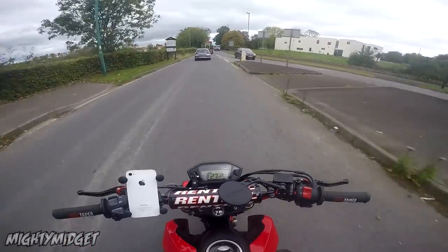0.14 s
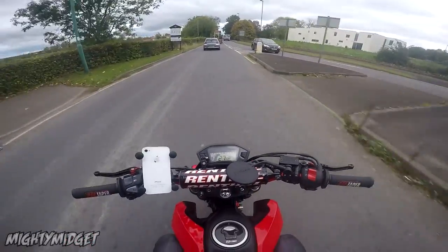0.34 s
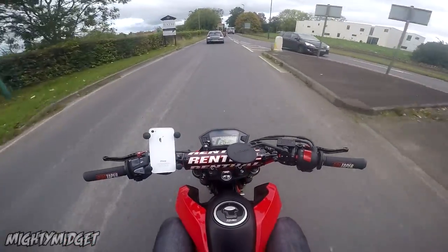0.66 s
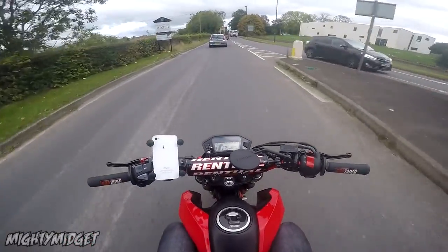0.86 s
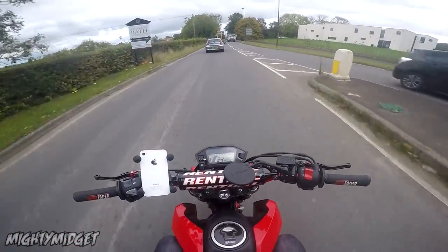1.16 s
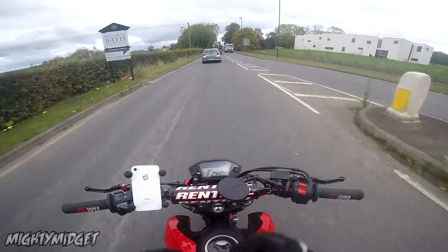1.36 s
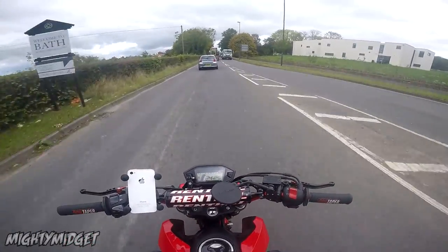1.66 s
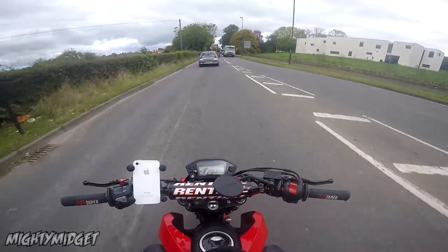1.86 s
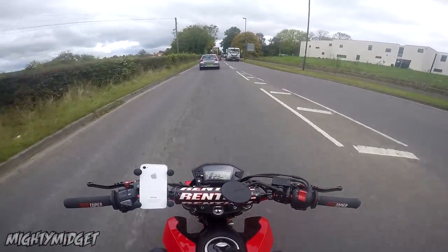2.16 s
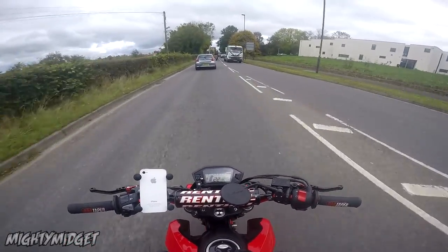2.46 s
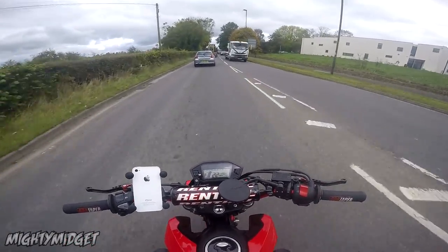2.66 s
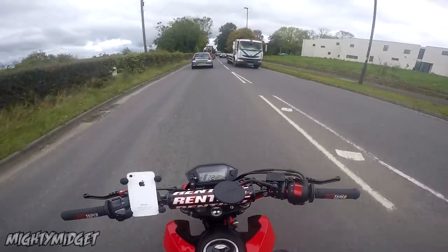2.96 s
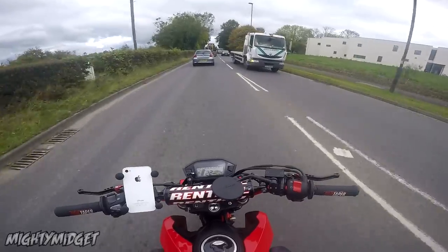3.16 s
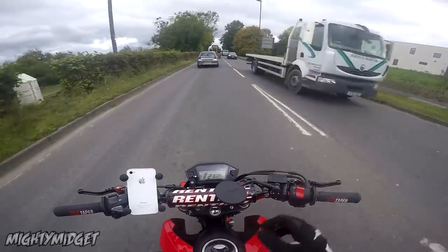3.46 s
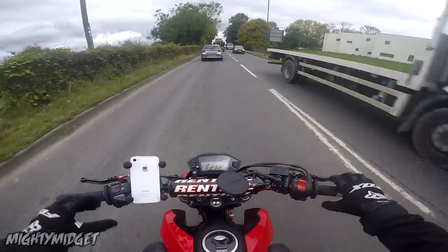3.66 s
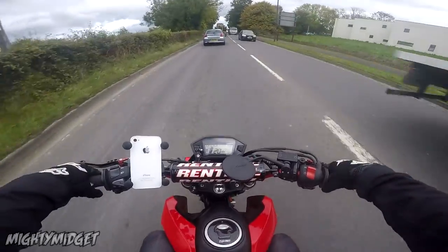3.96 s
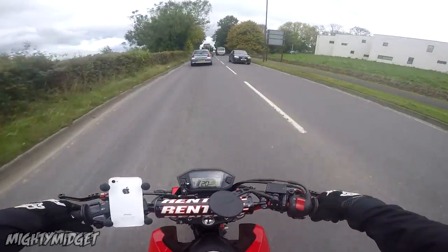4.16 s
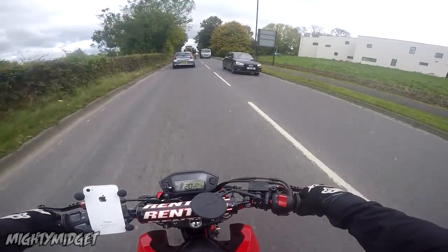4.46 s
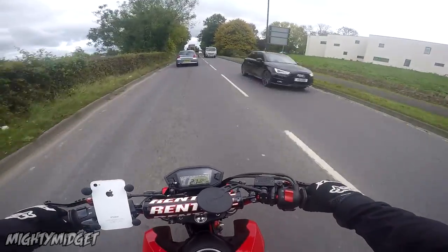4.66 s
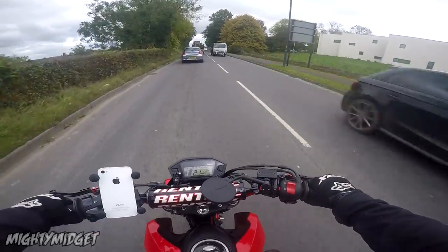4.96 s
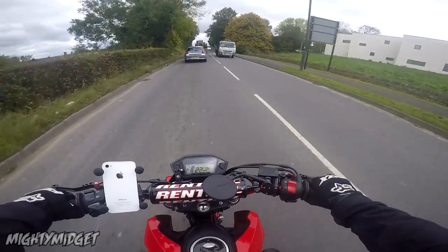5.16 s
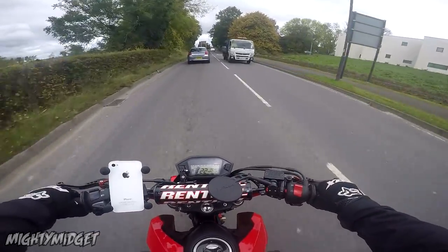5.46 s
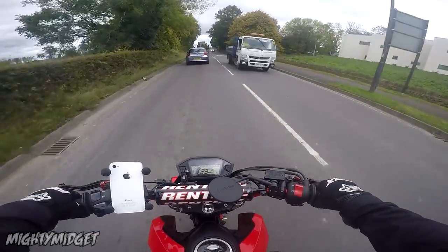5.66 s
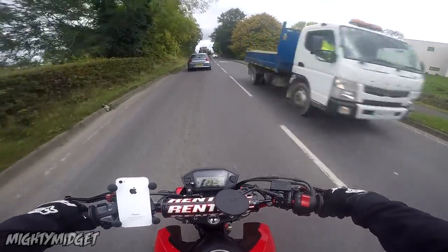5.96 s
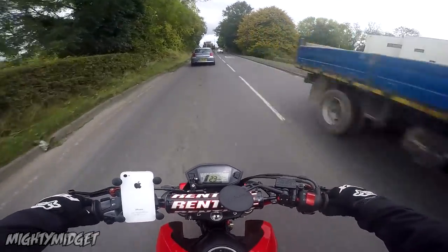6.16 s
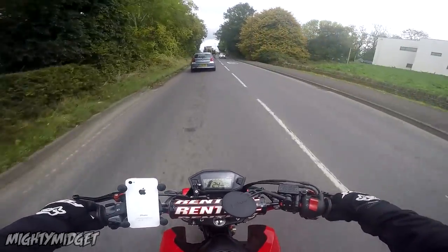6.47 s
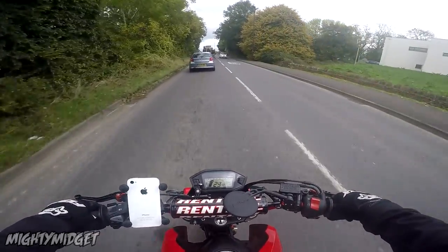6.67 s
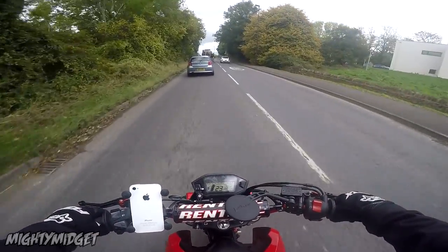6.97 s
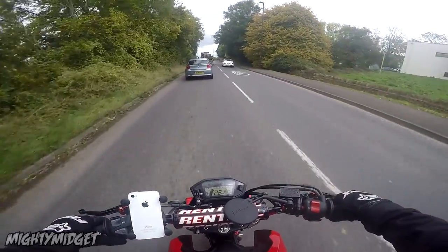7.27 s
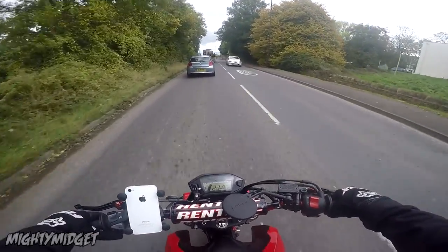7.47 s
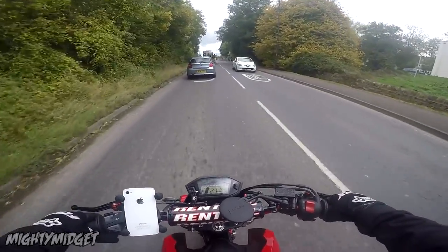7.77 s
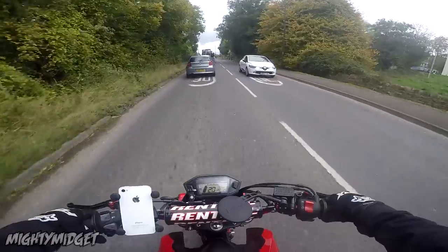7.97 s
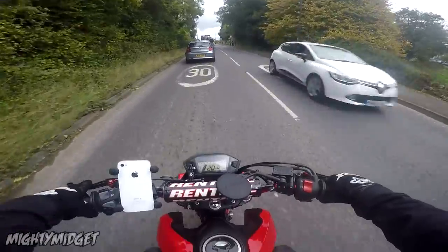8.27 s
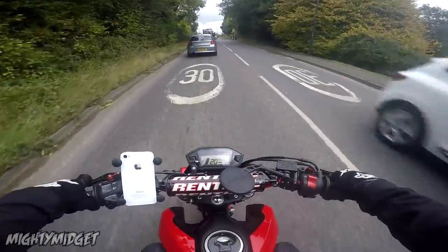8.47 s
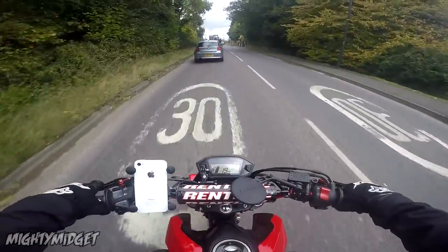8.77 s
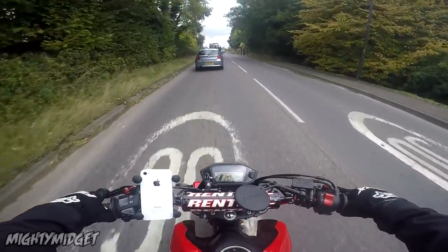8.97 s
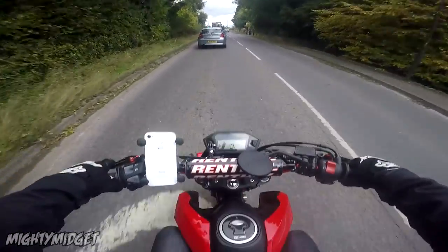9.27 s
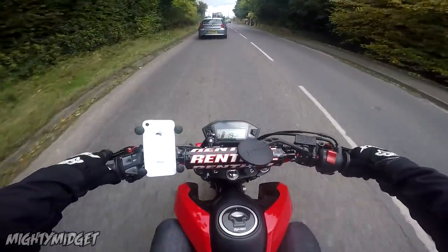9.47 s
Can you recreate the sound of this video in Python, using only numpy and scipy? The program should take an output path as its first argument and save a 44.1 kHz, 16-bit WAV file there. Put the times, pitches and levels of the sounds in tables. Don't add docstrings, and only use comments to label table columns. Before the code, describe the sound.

Close, muffled stereo from a motorcycle rider: low fluttering exhaust thumps gradually fall in pitch, with scattered dull pops and sleeves rubbing. A truck whooshes past on the right. The engine then catches roughly and accelerates in a loud, clipped, cracking burst, releases to boomy overrun with rounder pops, and finally takes light throttle. Low wind buffeting and steady road roar continue, with further passing traffic.

```python
import sys
import numpy as np
from scipy import signal
from scipy.io import wavfile
from scipy.ndimage import uniform_filter1d

SR = 44100
rng = np.random.default_rng(int(sys.argv[2]) if len(sys.argv) > 2 else 0)


def natural_amplitude(level_db):
    exponent = np.asarray(level_db, float) / 20
    return 10 ** exponent


def digitize_waveform(pressure):
    field = np.atleast_2d(pressure).T
    bounded = np.clip(field, -1, 1)
    quanta = np.round(bounded * 32767).astype(np.int16)
    wavfile.write(sys.argv[1], SR, quanta)


N = 424240


def curve(table, t):
    s, *columns = np.transpose(table)
    return [np.interp(t, s, c) for c in columns]


def humps(table, t):
    return sum(db * np.exp(-((t - s) / half_s) ** 2) for s, db, half_s in table)


def unit(x):
    return x / np.sqrt(np.mean(x ** 2))


def band(x, lo_hz, hi_hz):
    sos = signal.butter(2, [lo_hz, hi_hz], "band", fs=SR, output="sos")
    return unit(signal.sosfilt(sos, x))


def noise():
    return rng.standard_normal((2, N))


def walk(rate_hz):
    k = int(SR / rate_hz)
    held = np.repeat(rng.standard_normal(N // k + 1), k)
    return unit(uniform_filter1d(uniform_filter1d(held, k), k)[:N])


def add_mode(out, peak_s, hz, t60_s, rise_s, gain, pan_db):
    lead_s = .75 / hz
    first = int((peak_s - lead_s) * SR)
    index = np.arange(max(first, 0), min(first + int(1.25 * t60_s * SR), N))
    for side, lag_s, pan_share in ((0, .00062, .96), (1, .0003, -1.4)):
        t = np.maximum(index / SR - peak_s + lead_s - lag_s, 0)
        shape = (1 - np.exp(-t / rise_s)) * np.exp(-np.log(1000) * t / t60_s)
        out[side, index] -= gain * natural_amplitude(pan_share * pan_db / 2) * shape * np.sin(2 * np.pi * hz * t)


# (time [s], rate [Hz])
CYCLE_RATE = [(0.0, 32.22), (0.6, 30.76), (1.06, 29.25), (2.07, 27.37), (4.34, 23.99), (4.59, 25.26),
              (4.8, 24.63), (4.97, 25.5), (5.72, 28.43), (6.02, 27.68), (6.47, 27.36), (7.34, 25.17),
              (8.4, 23.54), (8.59, 22.82), (8.83, 24.31), (8.99, 22.98), (9.15, 23.0), (9.62, 23.46)]
# (time [s], swing [ms], rate [Hz], decay [s])
CHAIN_SNATCH = (4.563, 5.1, 6.2, 0.2)


def cycles():
    t = np.arange(N) / SR
    turns = np.cumsum(curve(CYCLE_RATE, t)[0]) / SR
    first_turn = .032
    at = np.interp(np.arange(int(turns[-1]) + 1) + first_turn, turns, t)
    start_s, swing_ms, shake_hz, decay_s = CHAIN_SNATCH
    since = at - start_s
    shake = np.exp(-np.abs(since) / decay_s) * np.cos(2 * np.pi * shake_hz * since) * (since > -.01)
    jitter_s = .00012 * rng.standard_normal(len(at))
    return at + shake * swing_ms / 1000 + jitter_s


# (time [s], level [dB])
BOOM_LEVEL = [(0, -18), (2, -19.5), (4.3, -20.5), (4.6, -20.5), (4.78, -13.5), (5.55, -21), (5.75, -19),
              (5.9, -26.5), (6.0, -18), (7.1, -20), (8.62, -20.5), (8.71, -24.5), (9.0, -23.5), (9.4, -20),
              (9.62, -21)]
# (frequency [Hz], t60 [s], swell [s])
SILENCER_VOLUME = (95, .063, .05)


def boom(at, load_db):
    out = np.zeros((2, N))
    hz, t60_s, swell_s = SILENCER_VOLUME
    crest_s = at + .0082
    steadiness = 1 - .8 * (load_db > -99)
    chance = rng.standard_normal((len(at), 3)) * steadiness[:, None]
    pump_db = curve(BOOM_LEVEL, at)[0] - np.clip(load_db + 21, 0, 8)
    for s, db, (size, pitch, pipe) in zip(crest_s, pump_db, chance):
        add_mode(out, s, hz * (1 + .022 * pitch), t60_s, swell_s, natural_amplitude(db + 31.5 + size), 3.1)
        add_mode(out, s, 300 * (1 + .015 * pipe), .045, .002, natural_amplitude(db + 5 + 2.2 * size), 3.1)
        add_mode(out, s, 150 * (1 + .012 * pipe), .04, .004, natural_amplitude(db + 2 + 1.1 * pipe), 3.1)
    return out


# (time [s], level [dB])
STRAY_POPS = [
    [(0.002, -23.5), (0.064, -23), (0.094, -22.5), (0.222, -21.5), (0.317, -21.5), (0.347, -21.5),
     (0.411, -22), (0.508, -20.5), (0.604, -27), (0.637, -22.5), (0.671, -24), (0.736, -22.5), (0.768, -25),
     (0.836, -22.5), (0.903, -29), (0.936, -22), (1.038, -21.5), (1.072, -22.5), (1.141, -20.5),
     (1.279, -24)],
    [(1.524, -23.5), (1.558, -28), (1.665, -21), (1.772, -27.5), (1.808, -25.5), (1.915, -25.5),
     (1.988, -22), (2.098, -24.5), (2.21, -26.5), (2.319, -25), (2.431, -23.5), (2.58, -24.5),
     (2.694, -26.5), (2.805, -25), (2.919, -24.5), (3.191, -23), (3.31, -28.5), (3.425, -26), (3.746, -25),
     (4.029, -25), (4.402, -27)],
    [(5.99, -27), (6.207, -26), (6.389, -22.5), (6.536, -21), (6.722, -19.5), (6.834, -24), (6.987, -24.5),
     (7.141, -21), (7.222, -22.5), (7.699, -20.5), (7.822, -25.5), (7.945, -29), (8.07, -26),
     (8.195, -22.5), (8.323, -24), (8.448, -21.5), (8.535, -26.5), (8.579, -24.5), (8.622, -21.5)],
]


def strays(at, load_db):
    faint_share, faint_db = .27, -29
    s, pop_db = np.concatenate(STRAY_POPS).T
    s = at[np.abs(at[:, None] - s).argmin(axis=0)]
    unused = np.abs(at[:, None] - s).min(axis=1) > .012
    faint = at[unused & (load_db < -99) & (rng.random(len(at)) < faint_share)]
    s, pop_db = np.r_[s, faint], np.r_[pop_db, np.full(len(faint), faint_db)]

    knee_hz, sharp_db_per_hz = 28.26, 5
    sharp_db = -11 + sharp_db_per_hz * np.maximum(curve(CYCLE_RATE, s)[0] - knee_hz, 0)
    sharp_db -= .45 * np.maximum(pop_db + 27.5, 0)
    sharp_db += 1.1 * np.minimum(pop_db + 30, 0)
    return s, pop_db, sharp_db + 1.5 * rng.standard_normal(len(s))


def burn(at, burn_db, sharp_db, modes, scatter_db, detune, gas_db, crack_db):
    out, puff = np.zeros((2, N)), np.zeros(N)
    chance = rng.standard_normal((len(at), 2, len(modes)))
    hardness = np.clip((sharp_db + 18) / 10.5, 0, 1.3)
    for s, db, hard, (size, pitch) in zip(at, burn_db, hardness, chance):
        for (hz, t60_s, soft_db, hard_db, pan_db, ms), a, b in zip(modes, size, pitch):
            blend = max(1 - hard, 0) * natural_amplitude(soft_db) + hard * natural_amplitude(hard_db)
            mode_hz = hz * (1 + detune * b * min(hz / 600, 1))
            add_mode(out, s + ms / 1000, mode_hz, t60_s, 1 / hz, blend * natural_amplitude(db + scatter_db * a), pan_db)
        puff[min(int(s * SR), N - 1)] = hard * natural_amplitude(db + gas_db)
    t = np.arange(3000) / SR
    tail = (1 - np.exp(-t / .0008)) ** 2 * np.exp(-t / .0048)
    crack = band(band(noise(), 900, 2000), 700, 3000)
    gas = band(noise(), 330, 1300) + natural_amplitude(crack_db) * crack
    return out + signal.fftconvolve(puff, tail)[:N] * gas * natural_amplitude([[2.1], [-2.1]])


# (time [s], burn level [dB], sharpness [dB])
THROTTLE_OPEN = [
    [(4.55, -16.5, -12), (4.64, -15.5, -15.5), (4.75, -13, -13), (5.05, -14.5, -6), (5.65, -13.5, -6),
     (5.74, -11.5, -12), (5.81, -14, -15.5), (5.88, -15, -15), (5.97, -30, -11.5)],
    [(8.65, -23, -16), (8.68, -21, -16)],
    [(8.73, -24, -16), (8.85, -22, -17), (9, -23, -17), (9.2, -18.5, -18.5), (9.62, -19.5, -20)],
]
# (frequency [Hz], t60 [s], soft burn [dB], hard burn [dB], left minus right [dB], arrival [ms])
PIPE_MODES = [(83, .12, -9, 6, 2.1, 9.0), (122, .05, 10, 13.5, 1.2, .9), (248, .046, 12, 13, 4.8, -.15),
              (320, .03, 16.5, -3, 4.1, -.1), (330, .009, -9, 30, 4.1, .1), (450, .02, -15, 3, 4.1, .1),
              (560, .042, -15, 7, 5.5, -.64), (735, .02, -19, 5, 4.9, .4), (870, .02, -22, 1.5, 4.9, -.2),
              (1000, .036, -25, 2.5, 4.5, -.47), (1410, .027, -33, -5, 4.5, -.4),
              (2100, .012, -38, -14, 3.5, -.4)]
# (frequency [Hz], t60 [s], soft burn [dB], hard burn [dB], left minus right [dB], arrival [ms])
CAN_MODES = [(139.8, 0.031, 12.5, 19.5, 2.5, -1.7), (279.9, 0.04, 18.5, 13, 9, -0.48),
             (510, 0.0076, -1.5, 6, 3.1, 1.4), (650.6, 0.02, -3, 15, 5.4, 1.7),
             (1000, 0.021, -12, 2, 6.7, 1.5), (1400, 0.023, -22, -6.5, 7.9, 1.7),
             (1980, 0.013, -30, -14.5, 4, 1.7)]


def engine():
    at = cycles()
    out, load_db = np.zeros((2, N)), np.full(len(at), -120.)
    for table in THROTTLE_OPEN:
        lit = (at > table[0][0]) & (at < table[-1][0])
        burn_db, sharp_db = curve(table, at[lit])
        load_db[lit] = burn_db
        out += burn(at[lit], burn_db, sharp_db, PIPE_MODES,
                    scatter_db=2.17, detune=.012, gas_db=-5, crack_db=-20)
    s, pop_db, sharp_db = strays(at, load_db)
    late_s = .0095 + .0003 * rng.standard_normal(len(s))
    out += burn(s + late_s, pop_db - .5, sharp_db, CAN_MODES,
                scatter_db=1.5, detune=.068, gas_db=-14.5, crack_db=-12.5)
    return out + boom(at, load_db)


def opening(t):
    burn_db = [np.interp(t, *np.transpose(table)[:2], left=-99, right=-99) for table in THROTTLE_OPEN]
    return uniform_filter1d(np.clip((np.max(burn_db, axis=0) + 26) / 12, 0, 1), size=3000)


def gear_whine(load):
    low = band(band(noise(), 1840, 1960), 1800, 2000)
    high = band(band(noise(), 2450, 2680), 2300, 2750)
    return natural_amplitude(-63 + .5 * load + 2.9 * walk(4.5)) * low + natural_amplitude(-73.5 + 1.8 * walk(6.2)) * high


# (time [s], lift [dB], half length [s])
GUST_SWELLS = [
    (.2, 8.5, 0.32),
    (1.56, 11, 0.09),
    (5.4, 13.5, 0.19),
    (5.8, 21, 0.11),
    (6.4, 15, 0.31),
    (7.73, 16, 0.15),
    (8.2, 13.5, 0.2),
]


def gusts(t):
    level_db = -48 + humps(GUST_SWELLS, t) + 3.5 * walk(2)
    return natural_amplitude(level_db) * band(noise() + .22 * rng.standard_normal(N), 24, 46)


# (frequency [Hz], gain [dB per Hz], likeness of the sides [0-1])
ROAR_COLOUR = [(59, 32.5, 0), (163, 26, 1), (302, 21, 0.9), (523, 19.5, 1), (793, 11, 0.1), (1250, 2, 0.1),
               (1896, -4.5, 0.8), (2580, -16.5, 0), (3330, -23, 0), (4360, -34, 0), (6000, -37.5, 0),
               (9200, -27.5, 0.7), (14100, -41, 0.9)]
# (time [s], lift [dB], half length [s])
PASSING_TRAFFIC = [
    (3.72, 7, 0.35),
    (4.95, 2, 0.24),
    (6.1, 7, .19),
    (8.31, 7, 0.21),
]


def road():
    t = np.arange(N) / SR
    load, passing_db = opening(t), humps(PASSING_TRAFFIC, t)
    knee_hz, db_per_hz = 26.5, .73
    near_db = -56 + db_per_hz * np.maximum(curve(CYCLE_RATE, t)[0] - knee_hz, 0)
    near_db += 5.5 * load ** 4 + passing_db
    pan_db = 1.5 + 1.5 * load - 3 * passing_db / 7
    out = gusts(t) + gear_whine(load)
    flutter = walk(27)
    hz_points, db_points, like_points = np.transpose(ROAR_COLOUR)
    for hz in 60 * 2 ** np.arange(0, 8.1, .5):
        db, like = (np.interp(np.log(hz), np.log(hz_points), c) for c in (db_points, like_points))
        follow = np.interp(np.log(hz), np.log([150, 600, 1200, 2600, 6000]), [.3, .6, 1.15, 1.15, .35])
        level_db = db + 10 * np.log10(hz / 2000) + follow * (near_db + 54.5) - 57
        level_db += 1.4 * walk(9) + 2.1 * flutter * (hz > 5000)
        mid, side = band(noise(), hz / 1.19, hz * 1.19)
        pair = np.sqrt(1 + like) * mid + np.sqrt(1 - like) * side * np.array([[1], [-1]])
        out += pair * natural_amplitude(level_db + np.array([pan_db, -pan_db]) / 2)
    return out


# (time [s], length [s], rub level [dB], hiss level [dB])
CLOTH_RUBS = [(0.028, 0.063, -56, -60), (0.337, 0.055, -78.5, -76.5), (0.48, 0.068, -73, -68.5),
              (1.416, 0.12, -63.5, -64.5), (1.538, 0.098, -56, -63.5), (1.646, 0.046, -55.5, -69.5),
              (1.786, 0.098, -62, -75), (2.003, 0.1, -65, -80.5), (2.147, 0.082, -74, -70),
              (2.306, 0.052, -69, -84), (2.493, 0.1, -58.5, -85.5), (2.647, 0.05, -63.5, -79),
              (2.791, 0.17, -65, -79.5), (2.955, 0.053, -58.5, -76), (3.001, 0.04, -57.5, -75),
              (3.118, 0.05, -57.5, -69.5), (3.22, 0.058, -62.5, -77.5), (3.452, 0.06, -75, -65.5),
              (3.812, 0.054, -79, -66), (4, 0.018, -69, -68.5), (7.301, 0.028, -65, -64)]


def jacket():
    t, rub, hiss = np.arange(N) / SR, np.zeros(N), np.zeros(N)
    for s, length_s, rub_db, hiss_db in CLOTH_RUBS:
        shape = np.exp(-(2 * (t - s) / length_s) ** 2)
        rub += natural_amplitude(rub_db) * shape
        hiss += natural_amplitude(hiss_db) * shape
    grain = natural_amplitude(1.6 * walk(150)) * natural_amplitude([[4.1], [1.6]])
    shared = rng.standard_normal(N)
    rough = band(band(noise() + .5 * shared, 1300, 4800), 1500, 4700)
    fine = band(noise() + .9 * shared, 6000, 14000)
    return grain * (rub * rough + hiss * fine)


def scene():
    return engine() + road() + jacket()


def band_limit(x):
    return signal.sosfilt(signal.butter(12, 15700, fs=SR, output="sos"), x)


def record(dry):
    heard = signal.sosfilt(signal.butter(2, 24, "high", fs=SR, output="sos"), dry)
    return band_limit(np.clip(heard, -1, 1))


dry = scene()
out = record(dry)
digitize_waveform(out)
```